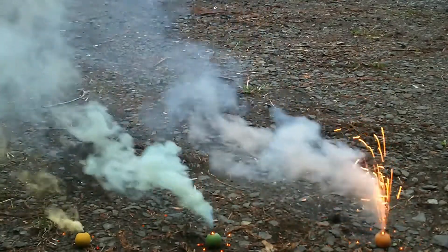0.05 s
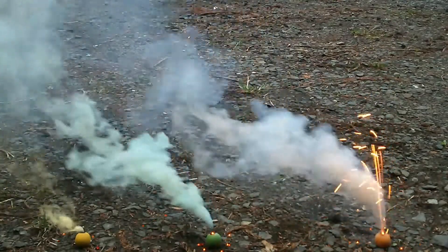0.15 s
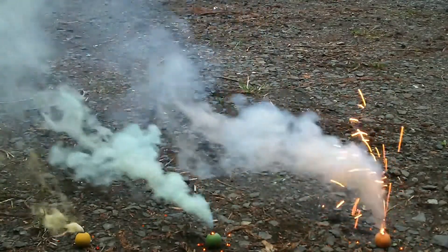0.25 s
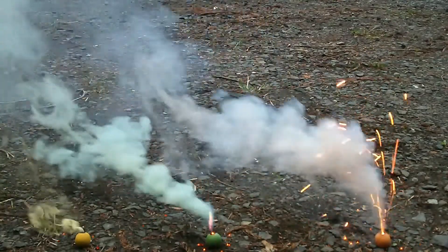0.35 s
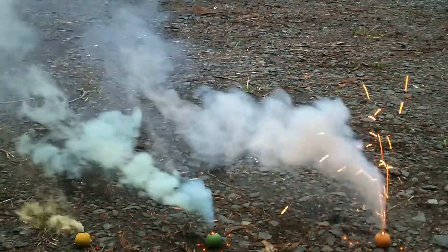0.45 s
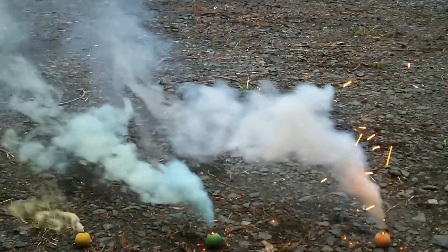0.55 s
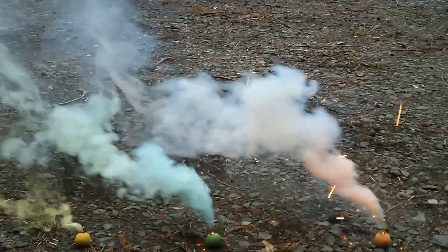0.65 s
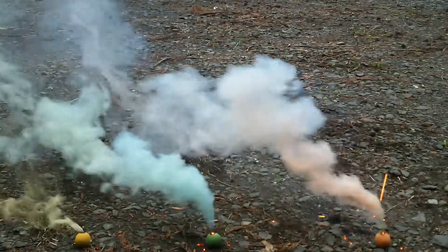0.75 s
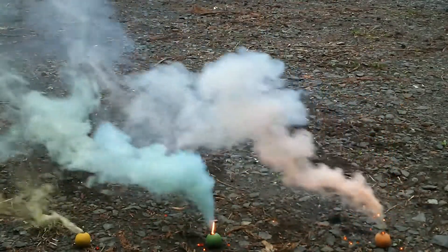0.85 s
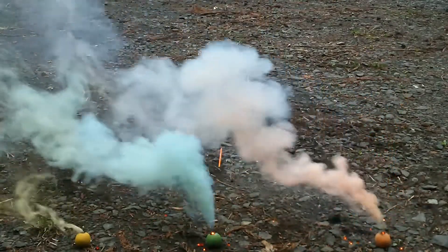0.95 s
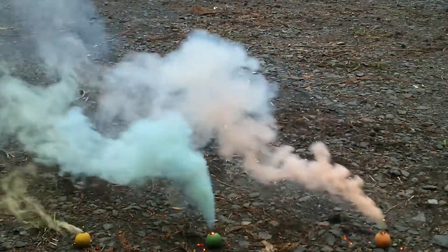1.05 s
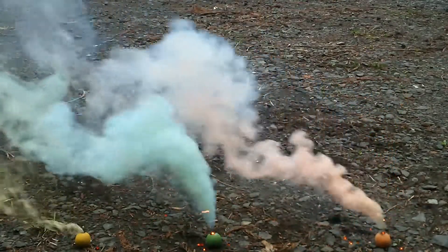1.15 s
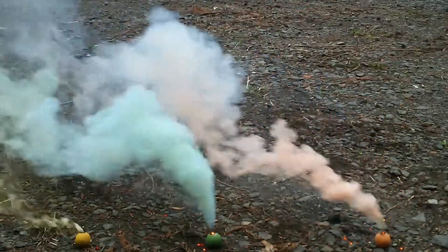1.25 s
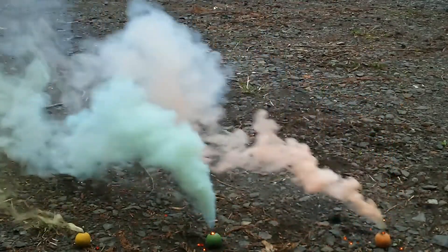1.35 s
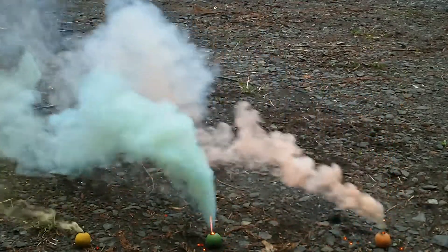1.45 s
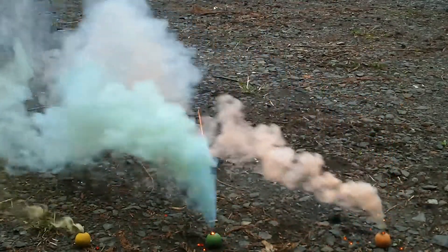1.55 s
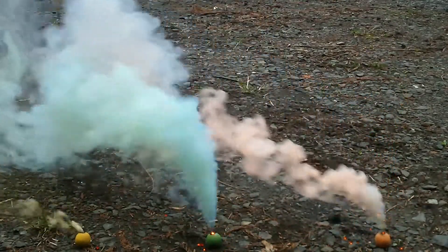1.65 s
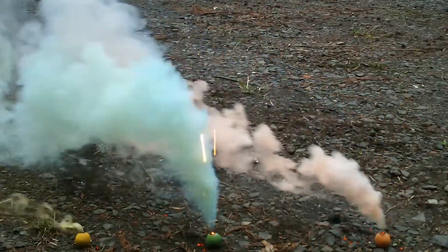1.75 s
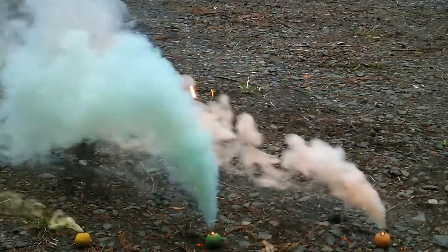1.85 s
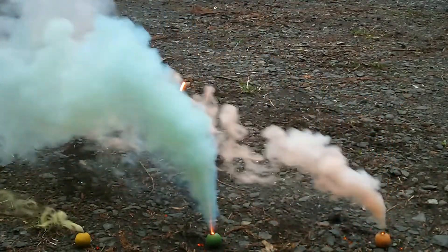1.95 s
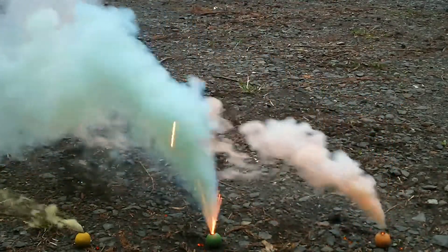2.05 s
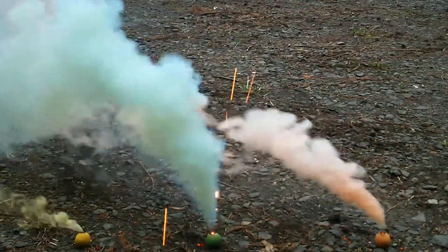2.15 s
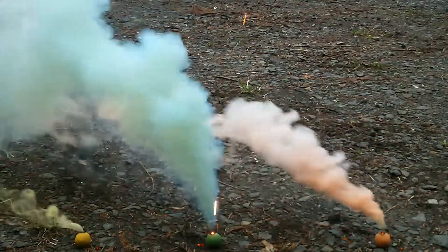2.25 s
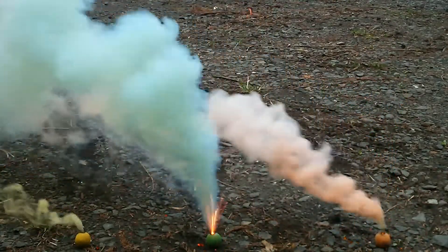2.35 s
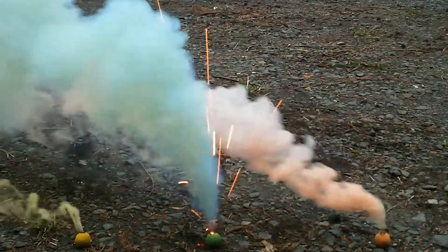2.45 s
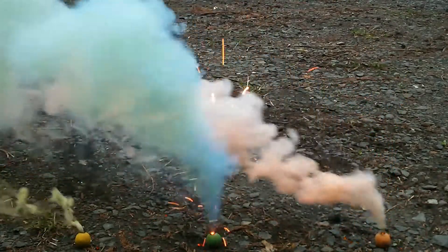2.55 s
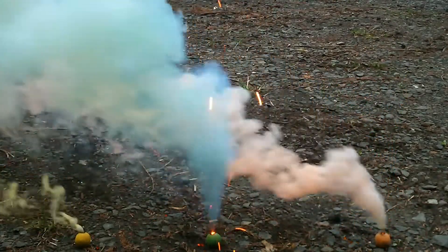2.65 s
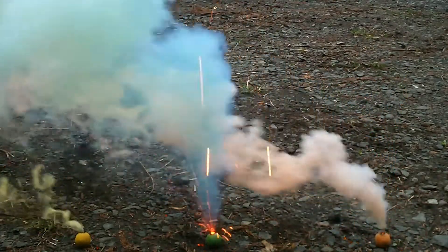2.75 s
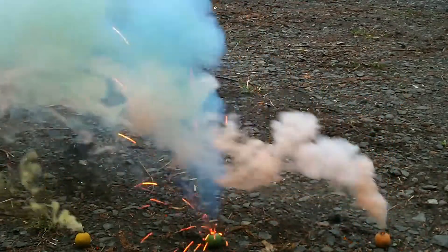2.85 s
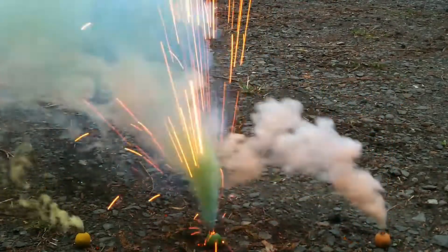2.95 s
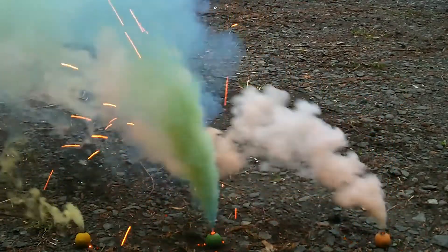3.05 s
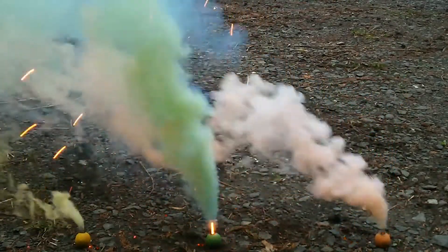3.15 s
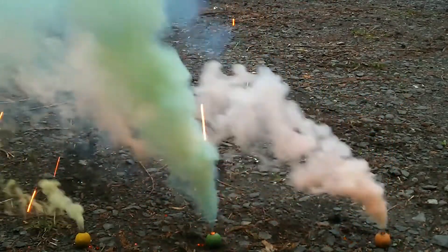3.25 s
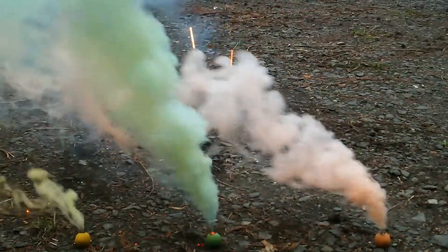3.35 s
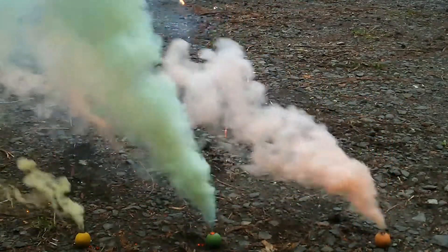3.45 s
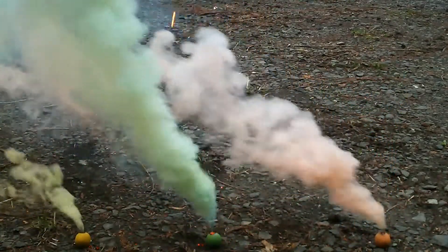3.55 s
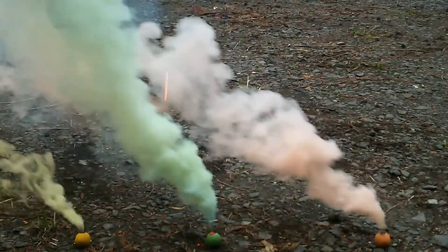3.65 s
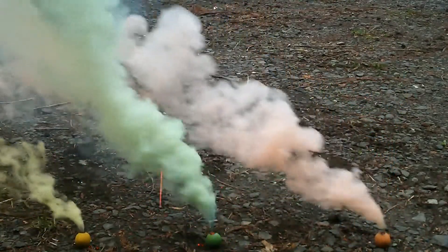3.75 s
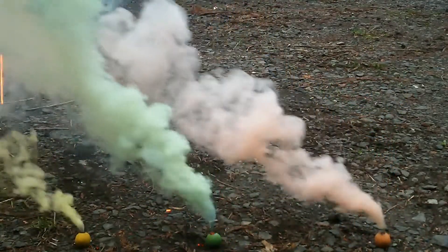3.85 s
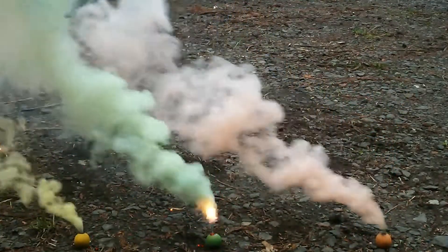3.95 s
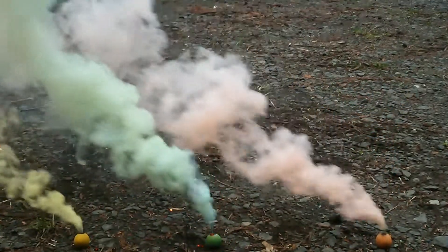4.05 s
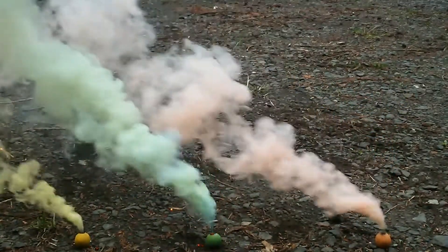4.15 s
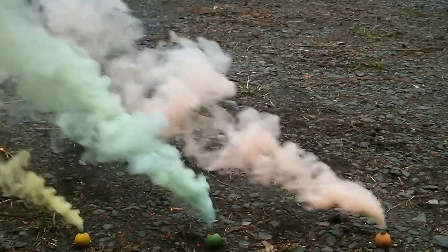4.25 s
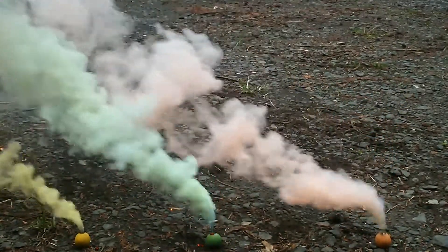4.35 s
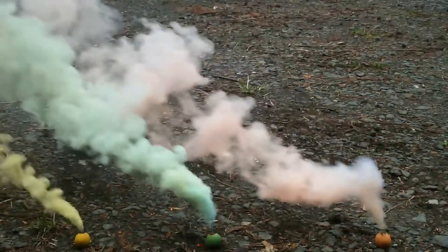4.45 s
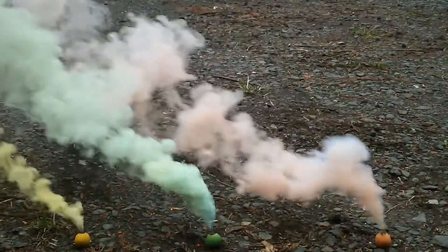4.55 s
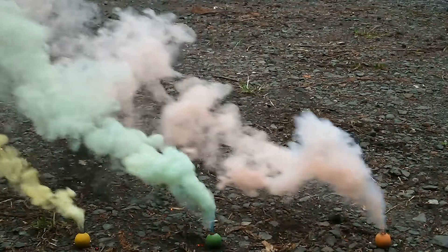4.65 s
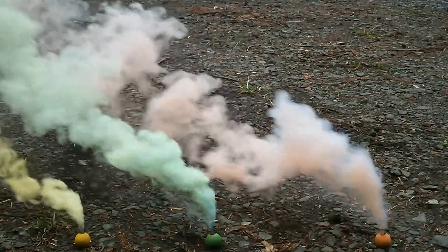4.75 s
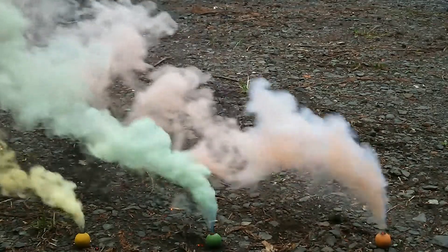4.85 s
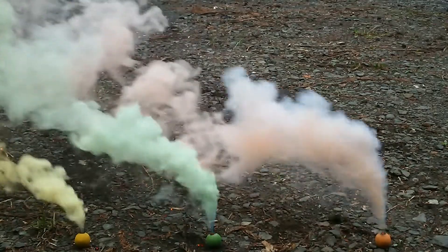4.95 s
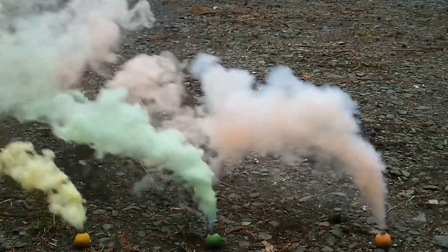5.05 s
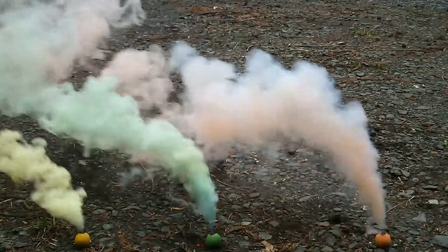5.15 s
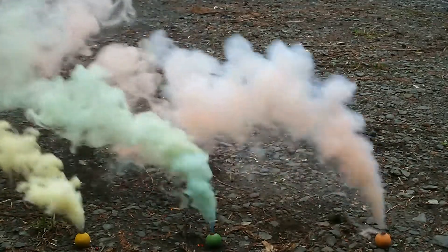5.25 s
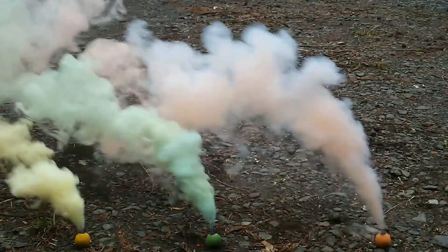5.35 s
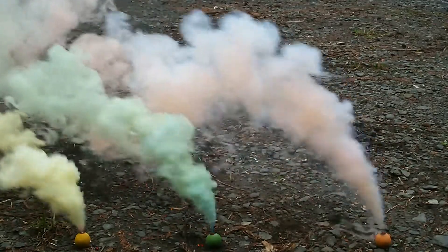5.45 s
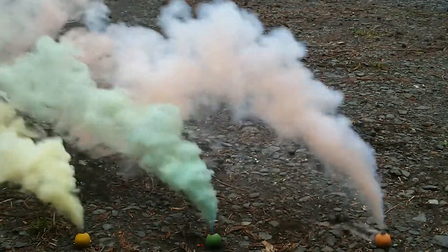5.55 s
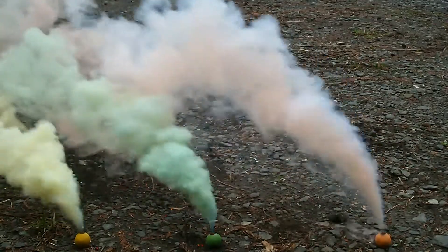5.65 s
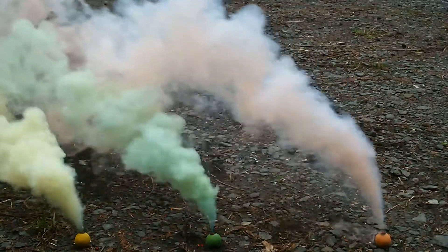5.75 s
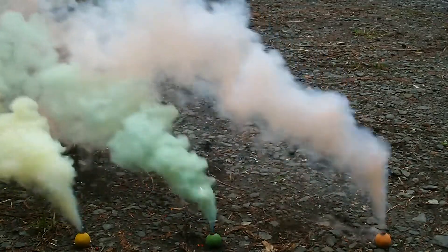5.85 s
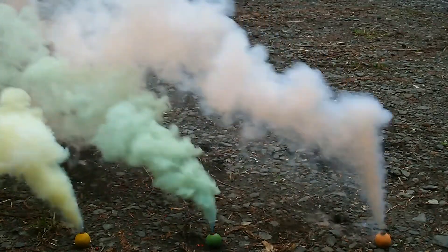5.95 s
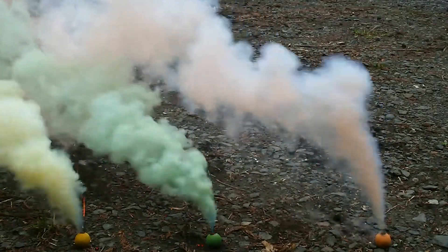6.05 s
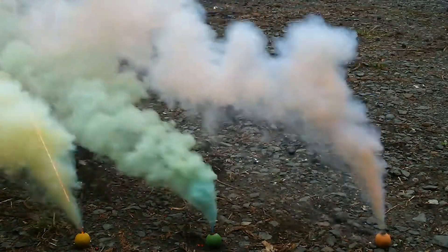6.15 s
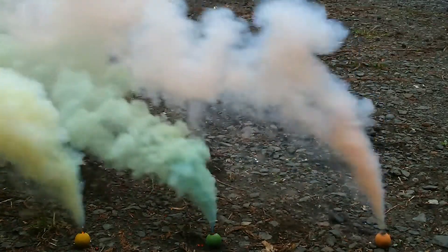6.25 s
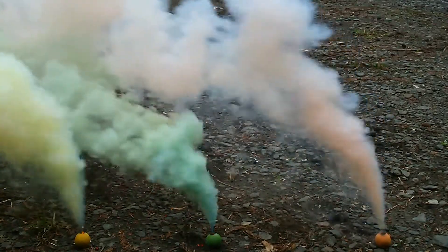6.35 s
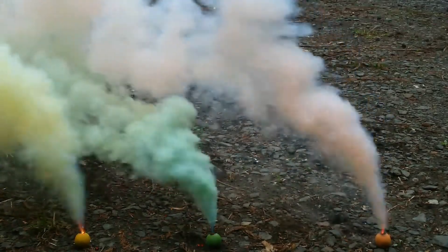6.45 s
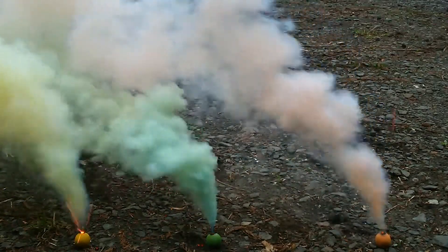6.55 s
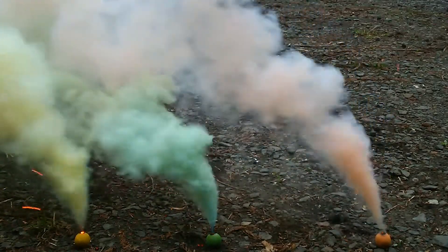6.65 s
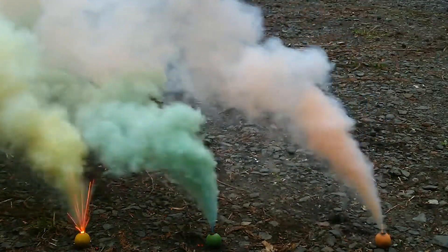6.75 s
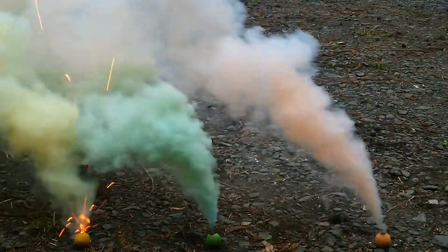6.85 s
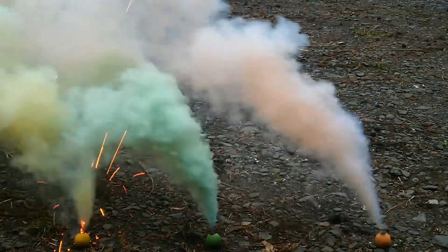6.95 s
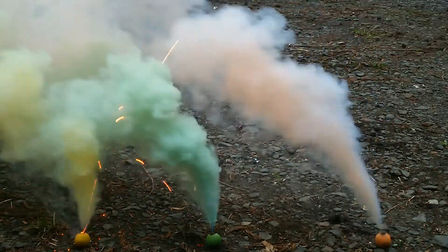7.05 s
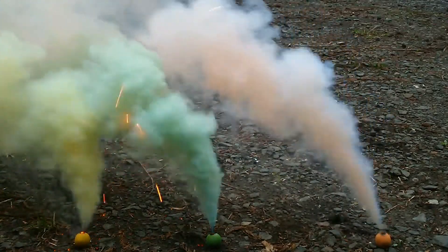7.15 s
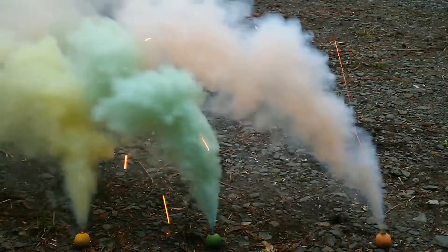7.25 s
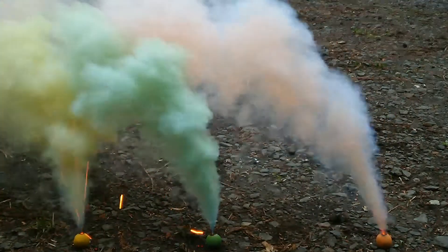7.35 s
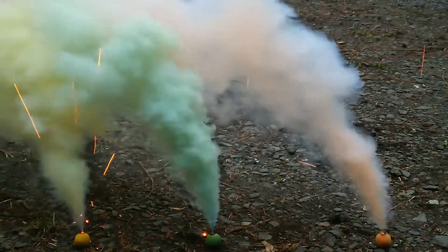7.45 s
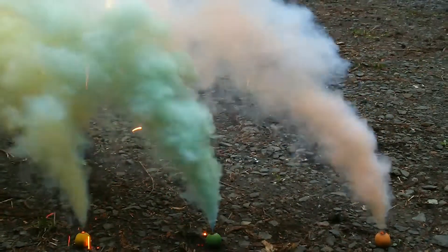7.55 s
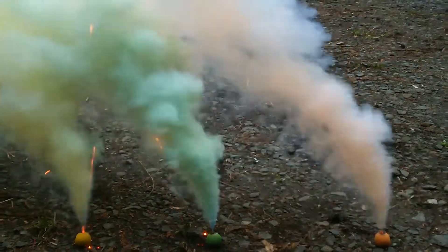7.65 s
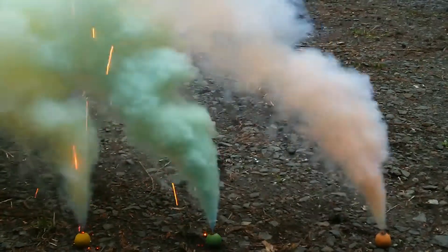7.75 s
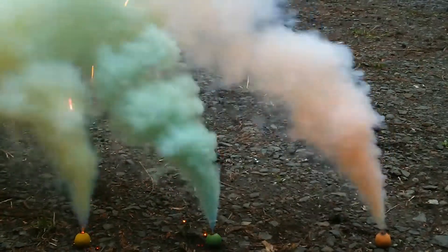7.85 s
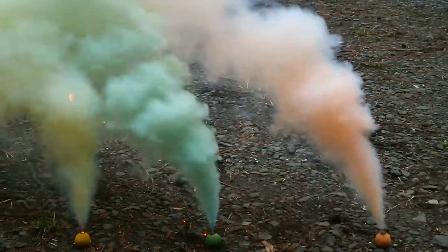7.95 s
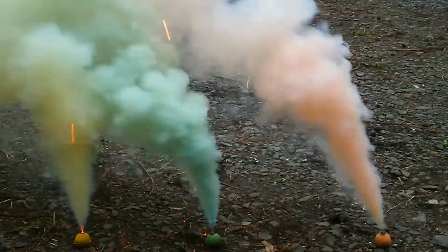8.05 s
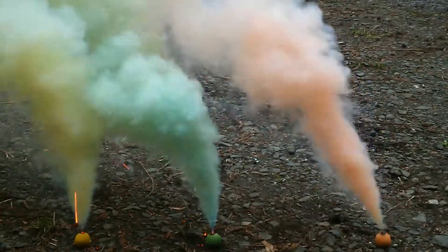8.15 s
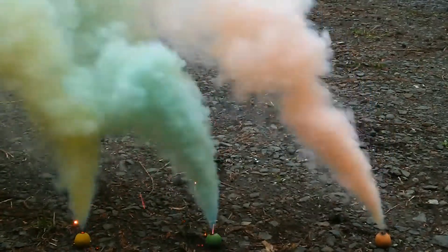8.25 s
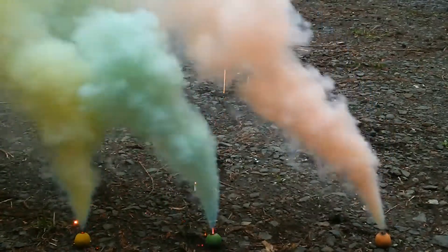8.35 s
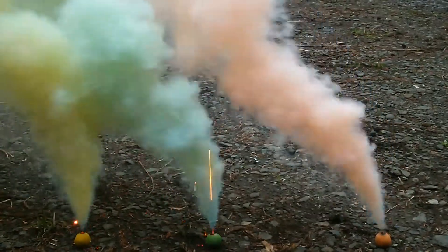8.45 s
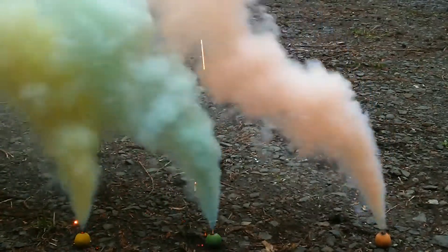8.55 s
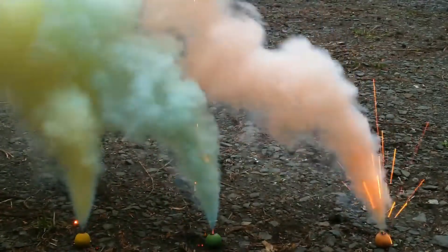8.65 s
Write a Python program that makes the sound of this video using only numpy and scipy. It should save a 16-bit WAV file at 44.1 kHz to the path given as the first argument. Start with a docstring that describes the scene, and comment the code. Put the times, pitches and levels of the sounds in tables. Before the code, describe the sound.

Smoke balls hiss and sputter outdoors over a low burning roar, with one sharp pop that briefly drops the hiss.

```python
"""A fluttering hiss over a roar of burning: three smoke balls on gravel, close to a stereo microphone.
Orange, green and yellow take turns to jet, each vent hissing at its own pitch. Slag makes the flow surge
and choke; the vents gasp when they clog and spit sparks, and the orange one half whistles.
The green ball blows out a plug with one sharp pop, and the hiss sinks for a second.
Soft whoomps and thuds, open air and a low, breezy rumble lie underneath."""
import sys
import numpy as np
from scipy import signal
from scipy.fft import rfft, irfft, next_fast_len
from scipy.io import wavfile
from scipy.ndimage import map_coordinates

SR = 44100
rng = np.random.default_rng(int(sys.argv[2]) if len(sys.argv) > 2 else 0)


def file_out(sig):
    """Save sig as 16-bit WAV at sys.argv[1]."""
    # one column per channel
    cols = np.atleast_2d(sig).T
    # limit, then scale
    lim = np.clip(cols, -1, 1)
    pcm = np.round(lim * 32767).astype(np.int16)
    wavfile.write(sys.argv[1], SR, pcm)


N = 384111
TIME = np.arange(N) / SR
SIZE = next_fast_len(N)
BIN_HZ = np.maximum(np.arange(SIZE // 2 + 1) * SR / SIZE, 1)
POP_S = 3.0137

# tone colour of the yellow jet: frequency_hz, relative_db
YELLOW_COLOUR = [(180, -19.5), (370, -7), (600, -4.3), (850, -3.4), (1200, -3.5), (2300, -2.5),
                 (3400, -1.8), (4400, -2), (5000, 1), (6000, 4), (7300, 0.3), (9000, -6), (11500, -15.3),
                 (14500, -27)]
# phase lead of the right channel for each jet, opposite in the bass, nearly in step at the top:
# frequency_hz, lead_rad
ORANGE_PHASE = [(300, 3.16), (3000, 2.94), (5000, 5.15), (6100, 3.9), (7300, 4.38), (10000, 5.5)]
GREEN_PHASE = [(300, 3.5), (3500, 2.5), (5000, 3), (6000, 0.5), (7000, 0.6), (10000, 1)]
YELLOW_PHASE = [(300, 3), (1700, 2.5), (3000, 0.7), (3800, 1.6), (5000, -1.15), (6500, -2), (9000, -3),
                (13000, -6)]


def from_db(db):
    """Decibels to gain."""
    return 10 ** (np.asarray(db) / 20)


def rms_one(x):
    """Scale to unit power."""
    return x / np.sqrt(np.mean(x ** 2) + 1e-20)


def over_hz(points):
    """A curve over the spectrum: points joined by straight lines in log frequency."""
    hz, value = np.transpose(points)
    return np.interp(np.log(BIN_HZ), np.log(hz), value)


def sound_of(spectrum):
    """A stereo spectrum as sound, at unit power."""
    return rms_one(irfft(spectrum, SIZE)[:, :N])


def filtered(x, hz, kind, order=2):
    """Causal Butterworth filter."""
    sos = signal.butter(order, np.clip(hz, 10, .45 * SR), kind, fs=SR, output="sos")
    return signal.sosfilt(sos, x + 1e-18)


def bend(x, speed):
    """Play both channels at a changing speed, so that the pitch moves."""
    return np.array([map_coordinates(side, [np.cumsum(speed)], mode="mirror") for side in x])


def drift(rate_hz):
    """Smooth random motion of spread 1."""
    pole = np.exp(-80 * np.pi * rate_hz / SR)
    slow = signal.lfilter([1], [1, -2 * pole, pole * pole], rng.standard_normal(N // 40 + 2002))[2000:]
    return np.interp(np.arange(N) / 40, np.arange(len(slow)), rms_one(slow))


def swell(middle_s, length_s):
    """A bell-shaped envelope."""
    return np.exp(-2 * np.minimum(((TIME - middle_s) / length_s) ** 2, 20))


def step(middle_s, length_s):
    """A smooth rise from 0 to 1 around a moment."""
    return .5 + .5 * np.tanh((TIME - middle_s) / (2 * length_s))


def bursts(events, decay_s):
    """An envelope that jumps at each (start_s, level_db) and dies away."""
    starts = np.zeros(N)
    for start_s, level_db, *_ in events:
        starts[int(start_s * SR)] += from_db(level_db)
    return signal.lfilter([1], [1, -np.exp(-1 / (decay_s * SR))], starts + 1e-18)


def blast(middle_s, width_s):
    """One pressure wave, a push and then a suck, of height 1."""
    phase = (TIME - middle_s) / width_s
    return -phase * np.exp((1 - phase ** 2) / 2)


def thump(start_s, pitch_hz, decay_s):
    """A shove of air that swings a few times and dies."""
    age = np.clip(TIME - start_s, 0, .5)
    return np.sin(2 * np.pi * pitch_hz * age) * np.exp(-age / decay_s)


def reflections():
    """Direct sound plus a few dull echoes: a comb that ripples the spectrum."""
    # echoes off the ground and things near by: delay_s, signed_gain, dull_above_hz
    echoes = [(.00275, -0.1, 2400), (0.0176, .14, 2500)]
    return 1 + sum(gain * np.exp(-2j * np.pi * BIN_HZ * delay_s) / (1 + (BIN_HZ / dull_hz) ** 2)
                   for delay_s, gain, dull_hz in echoes)


def gravel(scatter=.21, decay_s=.0023):
    """Stones scatter many tiny echoes into each port: a fine, still ripple in the spectrum."""
    echoes = rng.standard_normal((2, SR // 50)) * np.exp(-TIME[:SR // 50] / decay_s)
    return 1 + scatter * rfft(echoes / np.linalg.norm(echoes, axis=1, keepdims=True), SIZE)


def at_ports(phase, direct=1.0):
    """Spectrum of white turbulence at both microphone ports: shared direct sound plus gravel scatter."""
    # how alike the ports sound: frequency_hz, likeness (0-1)
    likeness = [(60, 0.78), (1000, 0.78), (2500, 0.67), (4000, 0.38), (5000, 0.59), (7000, 1), (9000, 0.7),
                (13000, 1)]
    # stereo balance: frequency_hz, left_minus_right_db
    balance = [(60, -1), (450, -2.5), (1500, -.3), (3300, 0.8), (4000, 0), (4350, 3), (4750, -2.5),
               (5750, -10), (6500, -3), (7700, 1.8), (12000, .5)]
    shared, left, right = rfft(rng.standard_normal((3, SIZE)))
    alike = np.clip(direct * over_hz(likeness), 0, 1)
    sides = np.array([[.5], [-.5]])
    straight = np.sqrt(alike) * shared * np.exp(-1j * sides * over_hz(phase))
    scattered = np.sqrt(1 - alike) * np.array([left, right])
    pan = from_db(sides * over_hz(balance))
    return (straight + scattered) * reflections() * pan / np.sqrt(np.mean(pan ** 2, axis=0))


def outdoors(rumble_db=-54.3, air_db=-45.8):
    """The bed: low rumble, breeze buffeting each port, and a soft wash of open air and smouldering."""
    # tone colours of the rumble and the open air: frequency_hz, relative_db
    rumble_colour = [(20, -10), (50, -4.5), (61, 5.5), (73, -1), (115, -2.5), (190, -21), (400, -44.5)]
    air_colour = [(130, -3.3), (250, -4), (380, -5), (550, -4.8), (700, -3.7), (900, -4.6), (1400, -5.5),
                  (1900, -2), (3000, -4), (4000, -10.5), (6000, -10.3), (10000, -21.5), (14500, -35)]
    # breeze swelling the rumble: middle_s, length_s, rise_db
    gusts = [(.6, 1.5, 4.5), (.66, .1, 6), (1.33, .12, 4), (4.15, .42, 6), (4.3, 2, 4.7), (5.65, .42, 7.5)]
    rumble = sound_of(at_ports(GREEN_PHASE, direct=1.1) * from_db(over_hz(rumble_colour)))
    breeze = sound_of(at_ports(GREEN_PHASE, direct=.72) * from_db(over_hz(rumble_colour)))
    air = sound_of(at_ports(GREEN_PHASE, direct=.59) * from_db(over_hz(air_colour)))
    rise = from_db(sum(abs(db) * swell(middle_s, length_s) for middle_s, length_s, db in gusts))
    low_end = from_db(rumble_db) * (rumble + np.sqrt(rise ** 2 - 1) * breeze)
    return low_end + from_db(air_db + .5 * drift(28)) * filtered(air, 112, "high")


def noise_swells(span=5.8):
    """Short swells of band noise: soft whoomps, low thuds and one brief crack."""
    # swells of band noise: middle_s, length_s, top_hz, level_db
    swells = [(1.29, .03, 110, -40), (2.405, .025, 2200, -43), (2.795, .028, 850, -33.5),
              (3.2, .2, 1400, -43), (3.305, .025, 160, -40), (3.5, .6, 850, -45.5), (4.096, .04, 500, -39),
              (4.15, .38, 130, -44.5), (5.919, .012, 4000, -30.5), (6.984, .034, 1200, -33.5),
              (6.98, .04, 280, -37)]
    noise = sound_of(at_ports(GREEN_PHASE))
    return sum(from_db(db) * swell(middle_s, length_s) * rms_one(filtered(noise, [hz / span, hz], "band"))
               for middle_s, length_s, hz, db in swells)


def sparks(per_s=14, level_db=-52, spread_db=4.4):
    """Tiny sparks fly at random throughout, each a brief bright fizz."""
    fizz = rms_one(filtered(sound_of(at_ports(GREEN_PHASE)), [3500, 7500], "band"))
    gap_draw, level_draw = rng.random((400, 2)).T
    starts_s = np.cumsum(-np.log(1 - gap_draw)) / per_s
    events = np.transpose([starts_s, level_db + spread_db * (2 * level_draw - 1)])
    return bursts(events[starts_s < TIME[-1]], decay_s=.012) * fizz


def spits(wave_db=-8.5, dull_db=-7.7, snap_db=-9.5):
    """A spat crumb gives a dull puff, a snap, a small pressure wave and a thump."""
    # burning crumbs spat from a vent: start_s, level_db, thump_db
    crumbs = [(.63, -28, -43), (.99, -30, -32), (2.066, -29, -48), (2.467, -28, -50), (2.673, -21.5, -40),
              (2.855, -21, -33), (5.911, -18, -25.5), (6.295, -30, -54), (6.567, -27, -52),
              (7.003, -26, -44)]
    waves = sum(from_db(db + wave_db) * blast(start_s + .00087, width_s=.00028)
                - from_db(thump_db) * thump(start_s, pitch_hz=115, decay_s=.009)
                for start_s, db, thump_db in crumbs)
    puffs = filtered(bursts(crumbs, decay_s=.012), 90, "low", order=1)  # softens the attack
    noise = sound_of(at_ports(GREEN_PHASE))
    dull = from_db(dull_db) * rms_one(filtered(noise, [100, 1100], "band"))
    snap = from_db(snap_db) * rms_one(filtered(noise, [1000, 4500], "band"))
    return puffs * (dull + snap) + waves * [[-1], [1]]


def gasps(attack_s=.006, release_s=.013, sag_db=2.2, flutter_db=1.8, whistle_above_hz=4200):
    """Gas forced past slag rings in one falling band: a narrow orange whistle or a wider yellow swish."""
    # gasps of a half-clogged vent and broad hiss leaking out: start_s, length_s, pitch_hz, level_db, leak_db
    breaths = [(.1, .018, 5000, -31, -55), (.15, .04, 4960, -36, -55), (.724, .042, 4700, -33.3, -56),
               (1.217, .024, 4900, -34.5, -60), (3.25, .036, 3100, -37.5, -45), (3.7, .06, 2900, -46, -52),
               (3.424, .026, 3050, -40.5, -57), (3.48, .058, 3050, -40, -56),
               (3.587, .04, 3150, -33.3, -48.5), (3.654, .036, 2500, -38.5, -47),
               (3.782, .14, 1600, -45.5, -63), (3.955, .085, 1720, -40.5, -58), (4.04, .62, 1850, -50, -61),
               (4.22, .075, 2500, -48.5, -54.5), (4.635, .085, 2930, -40.2, -55),
               (4.785, .068, 2930, -41.2, -54), (5.05, .105, 2660, -43.5, -60),
               (5.215, .09, 2340, -44.3, -60)]
    out = np.zeros((2, N))
    orange, yellow = sound_of(at_ports(ORANGE_PHASE)), sound_of(at_ports(YELLOW_PHASE))
    leak = sound_of(at_ports(YELLOW_PHASE) * from_db(over_hz(YELLOW_COLOUR)))
    for start_s, length_s, pitch_hz, level_db, leak_db in breaths:
        noise, half_width = (orange, .073) if pitch_hz > whistle_above_hz else (yellow, .19)
        near = np.abs(TIME - start_s) < length_s + .1
        gate = (step(start_s, attack_s) * (1 - step(start_s + length_s, release_s)))[near]
        spent = np.clip((TIME[near] - start_s) / length_s, 0, 1)
        edges_hz = pitch_hz * np.exp([-half_width, half_width])
        band = rms_one(filtered(noise[:, near], edges_hz, "band", order=3))
        band = bend(band, np.exp(.65 * half_width * (.5 - spent)))  # the pitch falls as it empties
        gas = from_db(level_db) * band + from_db(leak_db) * leak[:, near]
        out[:, near] += gate * from_db(-sag_db * spent) * gas
    return out * from_db(flutter_db * drift(70))  # the gas comes raggedly


def flow(ball, release_s=.014, linger_s=.16, pop_loss_db=9.5, drain_s=.03):
    """Gains of a ball's vent hiss and burning roar: it catches, settles, surges and may clog shut."""
    # burns by ball ("fuse" is the orange ball's opening burn):
    # lit_s, shut_s, attack_s, settling_s, first_hiss_db, full_hiss_db, first_roar_db, full_roar_db
    burns = {"fuse": (-.1, .87, .012, .5, -46, -43.8, -61, -39.5),
             "green": (.905, 3.298, .018, .6, -42.7, -31.6, -45.6, -40.4),
             "orange": (4.44, 10, .012, .6, -41.6, -39.2, -43, -50),
             "yellow": (5.842, 10, .021, 1.5, -37.8, -33.1, -40.4, -32.5)}
    # shifting slag opens (+) or chokes (-) a vent: ball, middle_s, length_s, more_hiss_db, more_roar_db
    surges = [("fuse", .34, .2, 4, 1.5), ("fuse", .74, .21, -10, 0), ("green", .96, .04, 6, 2),
              ("green", 1.165, .025, 5, 1), ("green", 1.25, .25, -6.5, -1.5), ("green", 1.318, .036, 9, 3),
              ("green", 1.7, .12, 1.2, 2), ("green", 1.87, .04, -1.5, -4), ("green", 1.96, .06, 1, 2.5),
              ("green", 2.325, .1, -.7, -10), ("green", 2.7, .3, 1.7, 5.9), ("green", 3.25, .09, -1, 2),
              ("orange", 4.88, .16, 2, 2), ("orange", 5.22, .06, -3, -1), ("orange", 5.83, .1, .5, 5),
              ("yellow", 5.88, .05, 4.2, 1.5), ("yellow", 6.01, .1, -.5, -3), ("yellow", 6.36, .05, 1.5, 3),
              ("yellow", 6.56, .07, 2.8, 4.5), ("yellow", 6.86, .04, 2.6, 2.2),
              ("yellow", 7.03, .36, -4, -2.6), ("yellow", 7.997, .033, 1.4, 4.2),
              ("yellow", 7.92, .3, 1.2, 1)]
    lit_s, shut_s, attack_s, settling_s, first_hiss, full_hiss, first_roar, full_roar = burns[ball]
    young = np.exp(-np.maximum(TIME - lit_s, 0) / settling_s)
    hiss_db = full_hiss + (first_hiss - full_hiss) * young
    roar_db = full_roar + (first_roar - full_roar) * young
    for name, middle_s, length_s, more_hiss_db, more_roar_db in surges:
        if name == ball:
            surge = swell(middle_s, length_s)
            hiss_db += more_hiss_db * surge
            roar_db += more_roar_db * surge
    if ball == "green":  # the pop lets the pressure out
        hiss_db -= pop_loss_db * (1 - np.exp(-np.maximum(TIME - POP_S, 0) / drain_s))
    caught = step(lit_s, attack_s)
    vent_open = 1 - step(shut_s, release_s)
    lingering = np.exp(-np.maximum(TIME - shut_s, 0) / linger_s)
    return caught * vent_open * from_db(hiss_db), caught * lingering * from_db(roar_db)


def whistle(ball, bend_per_db=.006, wobble=.018, flutter_hz=22):
    """A narrow resonance of the orange vent: it flutters, wobbles and goes flat when the flow chokes."""
    # the resonance in each burn: pitch_hz, width_hz, above_hiss_db, flutter_db
    resonances = {"fuse": (5070, 700, 4.6, 2.4), "orange": (5100, 620, -6.5, 3.3)}
    pitch_hz, width_hz, above_hiss_db, flutter_db = resonances[ball]
    gain, _ = flow(ball)
    band = sound_of(at_ports(ORANGE_PHASE) / (1 + (2 * (BIN_HZ - pitch_hz) / width_hz) ** 4) ** .5)
    flow_db = 20 * np.log10(np.clip(gain / np.average(gain, weights=gain ** 2), .1, 2))
    speed = 1 + bend_per_db * flow_db + wobble * drift(flutter_hz)
    return gain * from_db(above_hiss_db + flutter_db * drift(flutter_hz)) * bend(band, speed)


def sputter(x, span_hz=(1000, 7000), steps=16, swing_db=1.5, grit_db=.7):
    """Slag builds and breaks, so resonances come and go across the hiss; the powder burns grain by grain."""
    place = np.interp(np.log(BIN_HZ), np.log(span_hz), [0, steps])
    spectrum = rfft(x, SIZE)
    bands = (irfft(spectrum * np.maximum(1 - np.abs(place - k), 0), SIZE)[:, :N] for k in range(1, steps))
    shifting = sum(band * (from_db(swing_db * drift(12)) - 1) for band in bands)
    return (x + shifting) * from_db(grit_db * drift(160))


def jet(ball, colour, phase, flutter_db, flutter_hz, roar_swing_db, brightening):
    """Turbulence through a vent, hiss above and roar below; it flutters, and a faster jet gains treble."""
    body_hz, split_hz, treble_hz = 1500, 4200, 9000
    hiss_gain, roar_gain = flow(ball)
    noise = at_ports(phase) * gravel() * from_db(over_hz(colour))
    deep = 1 / (1 + (BIN_HZ / body_hz) ** 10)
    low = 1 / (1 + (BIN_HZ / split_hz) ** 16)
    top = 1 / (1 + (treble_hz / BIN_HZ) ** 10)
    hiss, treble, rasp, body = (irfft(noise * share, SIZE)[:, :N]
                                for share in (1 - low, top, low - deep, deep))
    speed = hiss_gain / np.average(hiss_gain, weights=hiss_gain ** 2)
    hiss = (hiss + treble * (speed ** brightening - 1)) / np.std(hiss)
    flutter = drift(flutter_hz)
    # small and large eddies surge each in their own way
    roar = sum(eddies * from_db(roar_swing_db * (.5 * flutter + drift(flutter_hz)))
               for eddies in (rasp, body))
    return hiss_gain * hiss * from_db(flutter_db * flutter) + roar_gain * rms_one(roar)


def smoke_jets():
    """The vents jet and sputter in turn: orange, green, orange again, then yellow joins in."""
    # tone colours of the jets: frequency_hz, relative_db
    fuse_colour = [(300, -27), (1000, -21), (2200, -23), (4000, -17), (4500, -10), (5600, -6.5),
                   (6500, -10.5), (8200, -23.5), (9100, -23.5), (10500, -35), (14500, -44)]
    green_colour = [(250, -28.5), (900, -8.5), (1500, -7), (3100, -1), (4100, -8), (5000, -7.5), (6000, 0),
                    (7000, -4), (8500, -12), (10500, -22.5), (14500, -32.5)]
    orange_colour = [(300, -6), (1300, -10), (2700, -3.5), (4300, -9.5), (4750, -2.5), (6000, -1.5),
                     (7300, -2.7), (8300, -10), (9200, -9.5), (11000, -18), (14500, -25)]
    fuse = jet("fuse", fuse_colour, ORANGE_PHASE,
               flutter_db=1.8, flutter_hz=22, roar_swing_db=2.8, brightening=.3)
    green = jet("green", green_colour, GREEN_PHASE,
                flutter_db=1.15, flutter_hz=18, roar_swing_db=1.8, brightening=1.0)
    orange = jet("orange", orange_colour, ORANGE_PHASE,
                 flutter_db=.9, flutter_hz=13, roar_swing_db=2.5, brightening=.25)
    yellow = jet("yellow", YELLOW_COLOUR, YELLOW_PHASE,
                 flutter_db=.9, flutter_hz=20, roar_swing_db=1.05, brightening=.14)
    return sputter(fuse + green + orange + yellow)


def pop(attack_s=.0007, gas_decay_s=.0064, body_decay_s=.0091):
    """The plug blows out: a sharp pressure wave, a thump over a boom, a rush of gas and a duller body."""
    # tone colour of the escaping gas: frequency_hz, relative_db
    gas_colour = [(50, -15), (150, -5.5), (320, -20), (500, -22), (1000, -22), (2000, -12.5), (3000, -9),
                  (4200, -13.5), (5900, -10.5), (8000, -18), (10500, -31), (14500, -51.8)]
    start_s = POP_S - .0011
    age = np.maximum(TIME - start_s, 0)
    wave = irfft(rfft(from_db(-2) * blast(POP_S, width_s=.00022), SIZE) * reflections(), SIZE)[:N]
    punch = from_db(-9.5) * thump(start_s, pitch_hz=155, decay_s=.009)
    boom = from_db(-20) * thump(start_s, pitch_hz=75, decay_s=.018)
    gas_noise = sound_of(at_ports(GREEN_PHASE) * from_db(over_hz(gas_colour)))
    body_noise = rms_one(filtered(sound_of(at_ports(GREEN_PHASE)), [470, 1150], "band"))
    gas = from_db(-7.7) * np.exp(-age / gas_decay_s) * gas_noise
    body = from_db(-14.3) * np.exp(-age / body_decay_s) * body_noise
    rise = 1 - np.exp(-age / attack_s)
    return (wave - punch - boom) * [[-1], [1]] + rise * (gas + body)


def scene():
    """All three balls and the air around them."""
    vents = smoke_jets() + whistle("fuse") + whistle("orange") + gasps()
    return vents + spits() + sparks() + noise_swells() + pop() + outdoors()


def record(dry):
    """Soft saturation rounds the loudest peak, and a steep low-pass cuts the top."""
    cutoff_hz = 15000
    return signal.sosfilt(signal.ellip(14, .1, 80, cutoff_hz, fs=SR, output="sos"), np.tanh(dry))


dry = scene()
out = record(dry)
file_out(out)
```